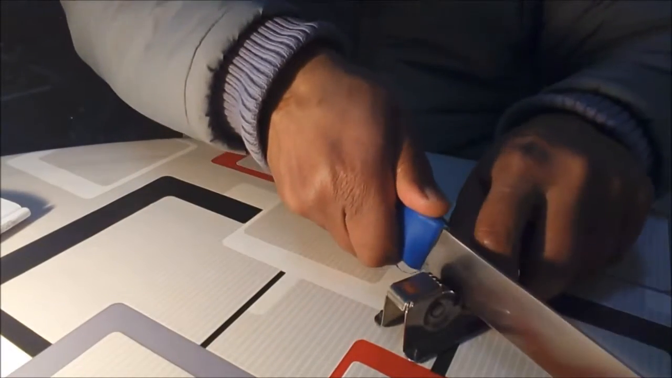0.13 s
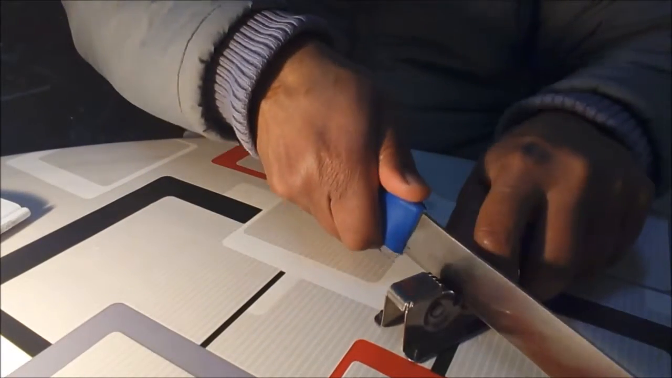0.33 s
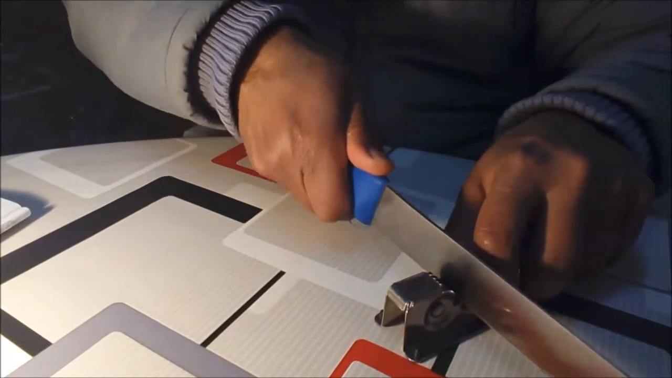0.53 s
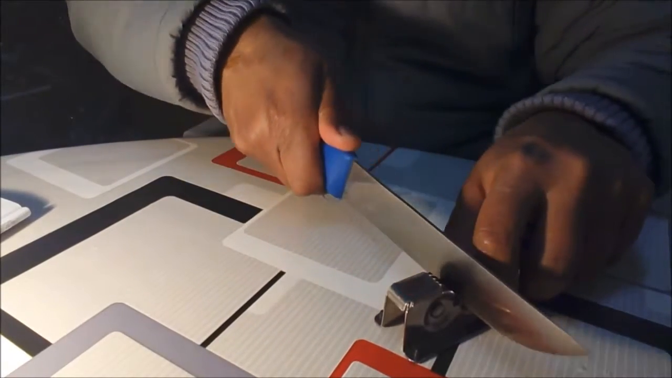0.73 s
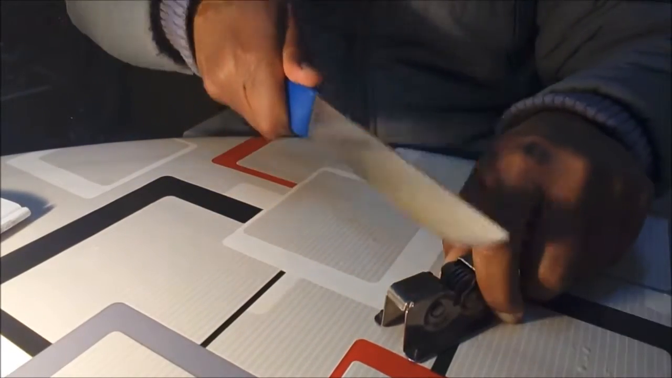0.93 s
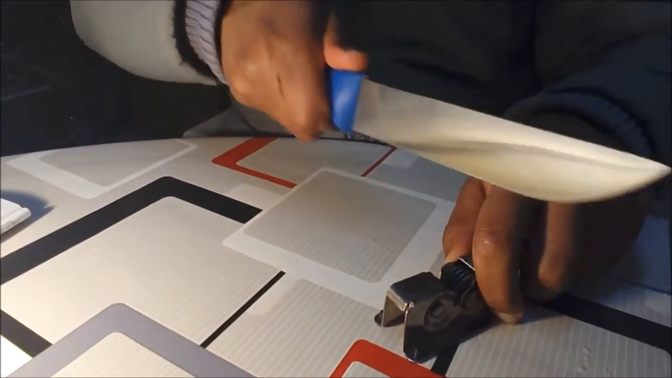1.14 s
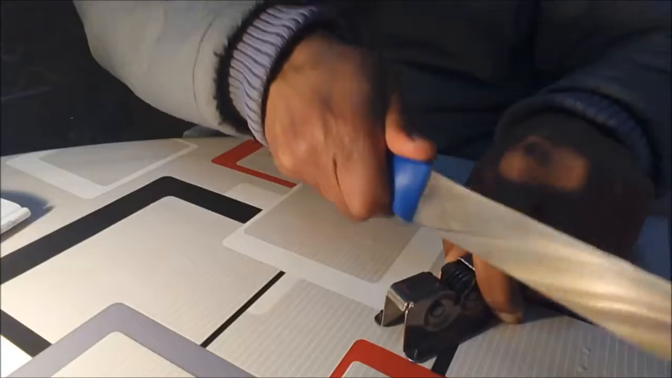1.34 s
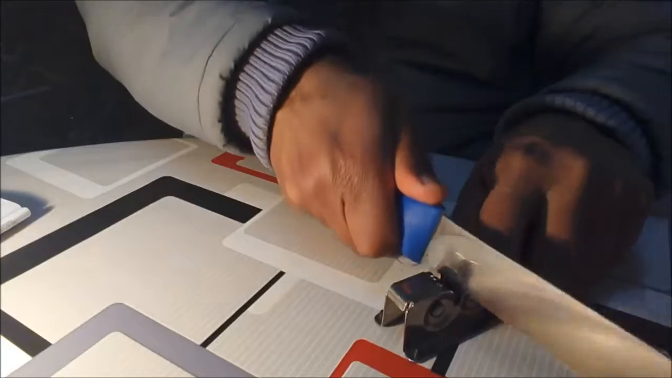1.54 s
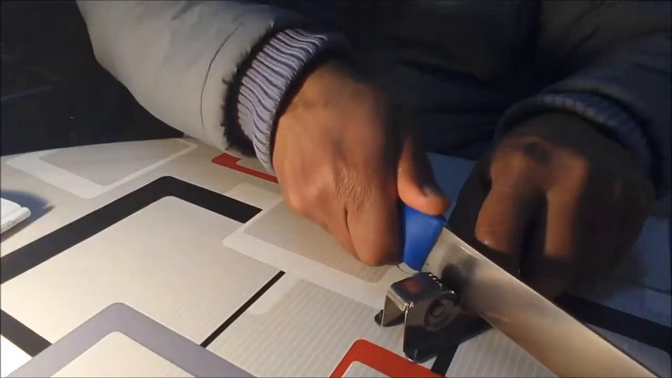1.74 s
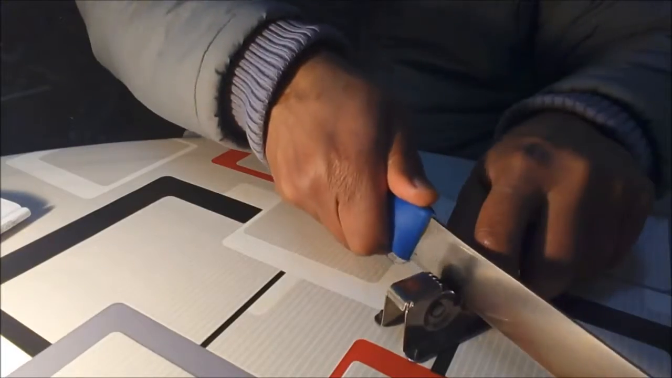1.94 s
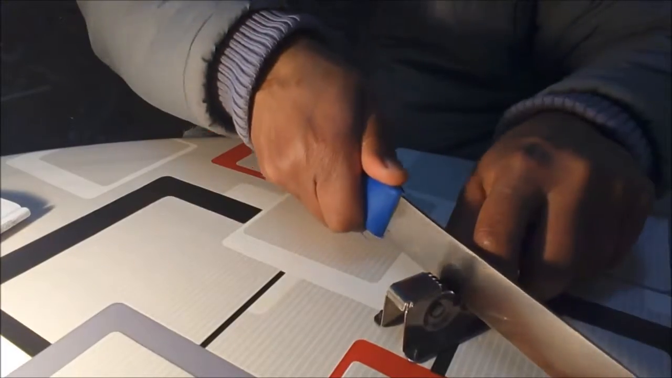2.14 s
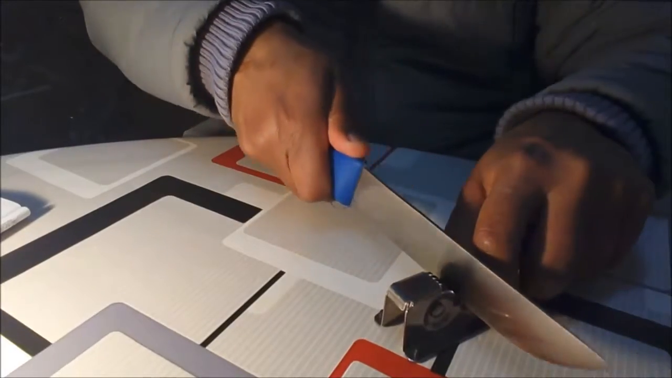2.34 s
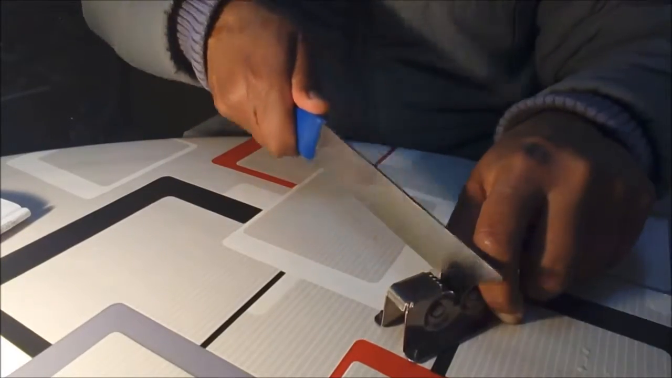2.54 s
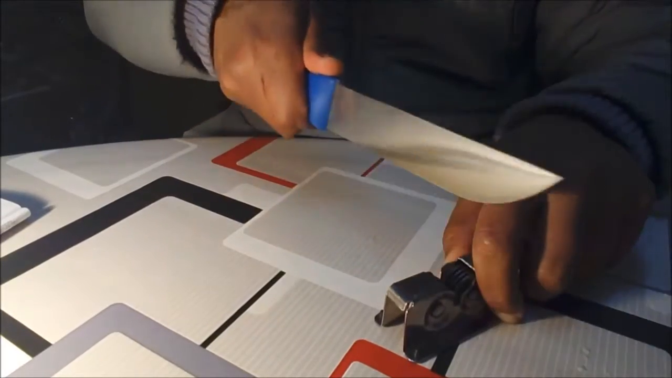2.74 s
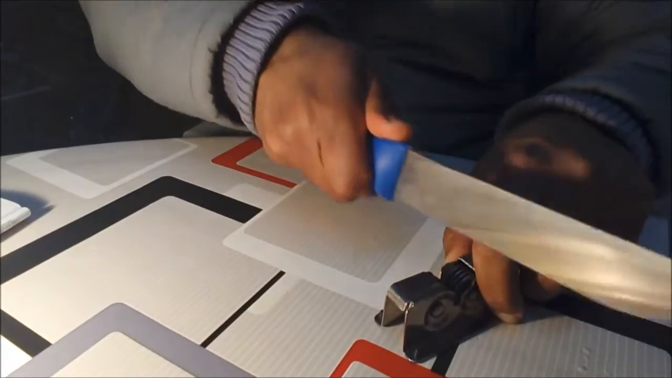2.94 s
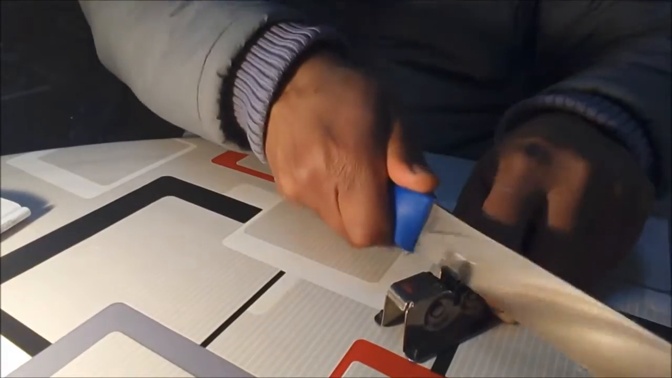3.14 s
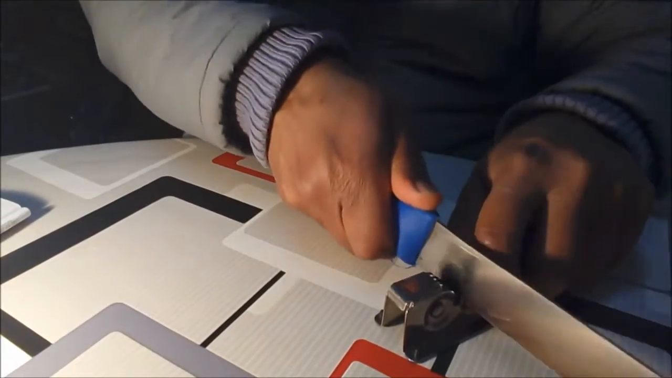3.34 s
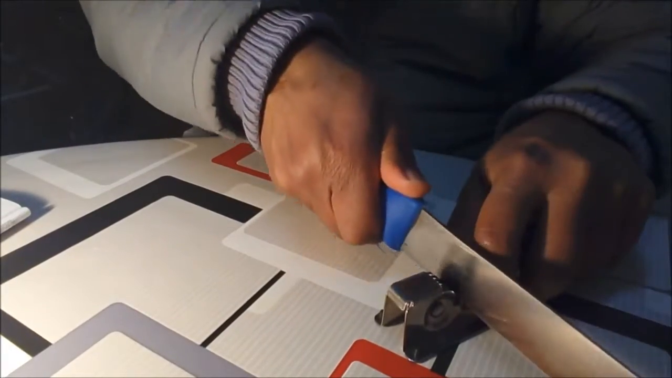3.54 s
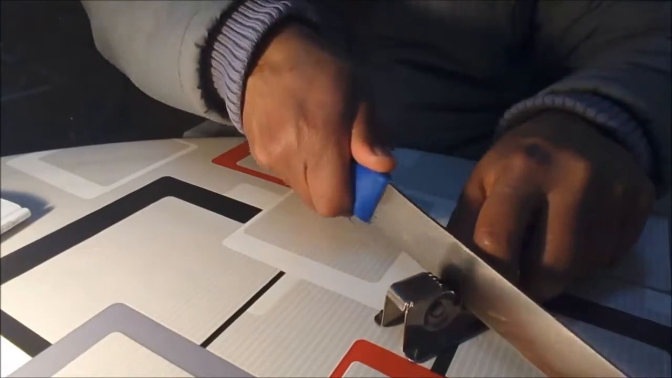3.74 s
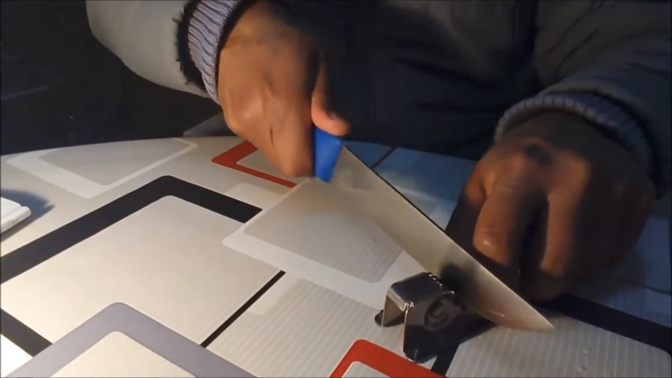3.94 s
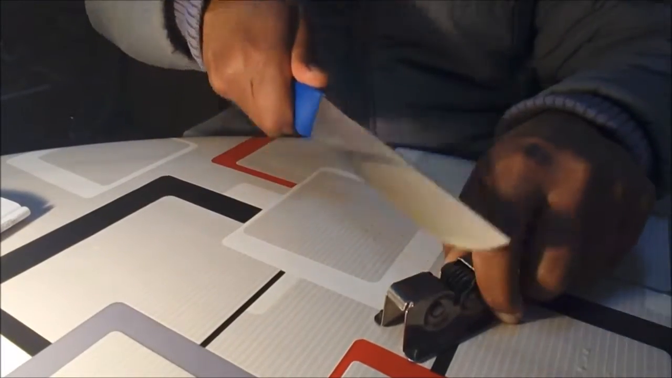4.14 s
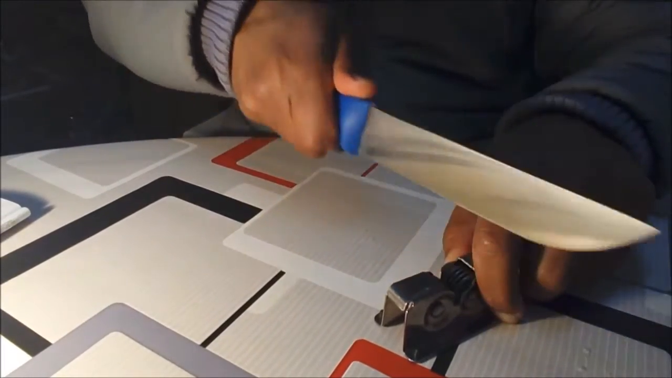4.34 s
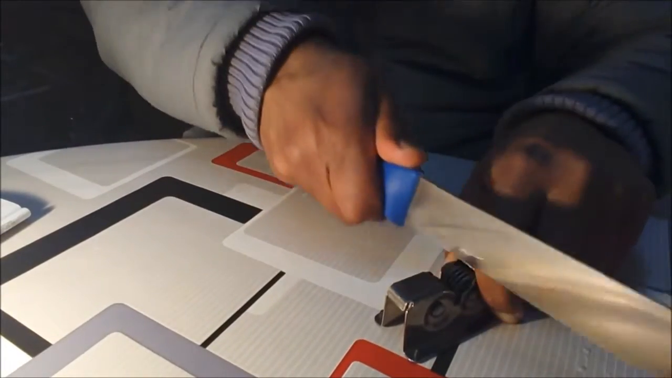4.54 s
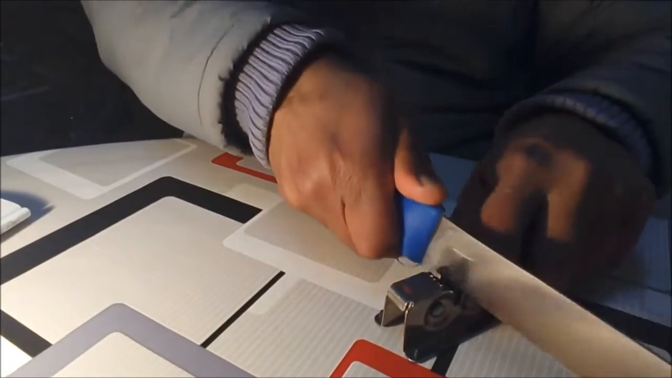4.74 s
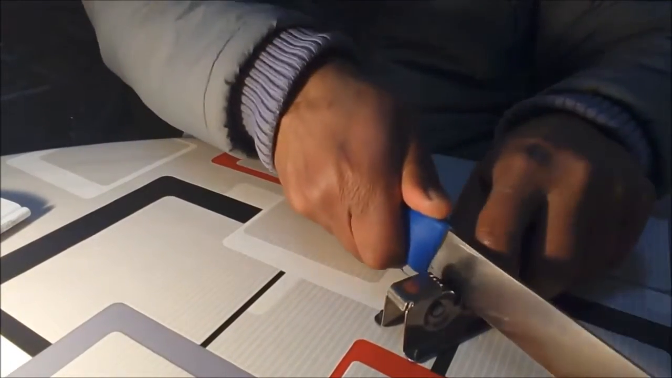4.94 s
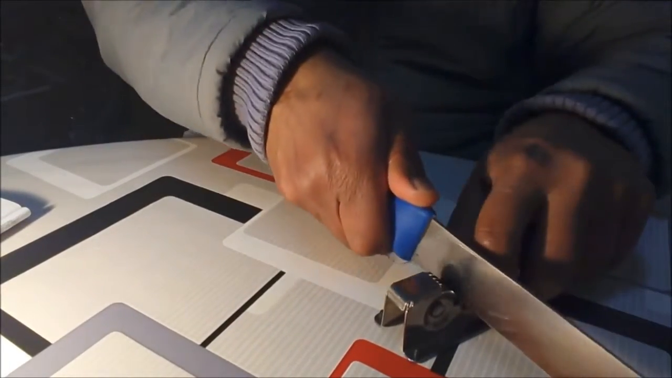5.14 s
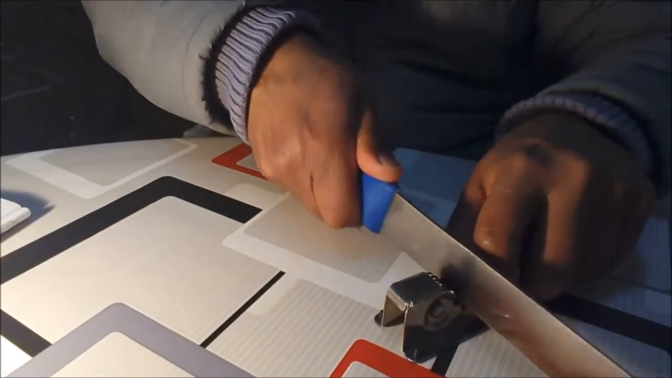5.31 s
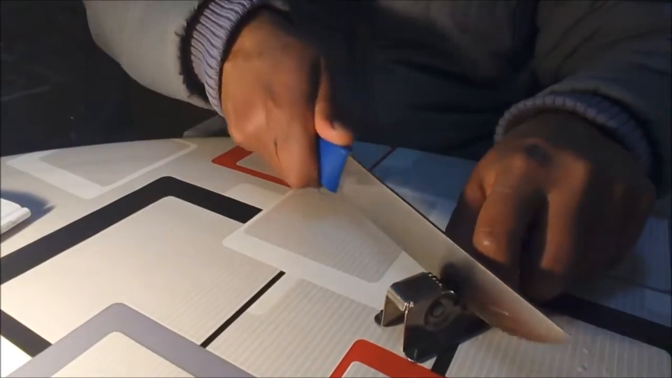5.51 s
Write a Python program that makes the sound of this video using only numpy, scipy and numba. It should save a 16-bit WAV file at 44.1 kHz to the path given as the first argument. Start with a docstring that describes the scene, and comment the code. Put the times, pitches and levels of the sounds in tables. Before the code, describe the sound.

Close up in a small quiet room, a knife blade is pulled through a little steel sharpener on a table. Each pull begins with a thud and sharp tick, grinds harshly over low table rumble, then the tip scratches free and the blade rings briefly. Three full strokes and a fourth cut off, with soft sleeve rubbing between.

```python
"""Knife on a disc sharpener

A kitchen knife is pulled through a small steel disc sharpener on a table, close up; the fourth pull is cut short.
Knocks ring the table's modes, and ticks are noise cracks with a short ring of the seated blade.
Each pull grinds from heel to tip: uneven noise through steel, grit and sizzle colours, over table rumble.
After the first three pulls the tip scratches off and the free blade rings in beating pairs.
Hands and sleeves rub softly between pulls, in a small, quiet room with faint air and hiss."""
import sys
import numpy as np
from scipy import signal
from scipy.fft import rfft, irfft
from scipy.io import wavfile
from scipy.ndimage import uniform_filter1d
from numba import njit

SR = 44100
rng = np.random.default_rng(int(sys.argv[2]) if len(sys.argv) > 2 else 0)


def generate_wav(signal):
    """Clip the signal to [-1, 1] and save it as 16-bit WAV at the path in sys.argv[1]."""
    frames = np.transpose(np.atleast_2d(signal))
    scaled = np.clip(frames, -1, 1) * 32767
    pcm = np.round(scaled).astype(np.int16)
    wavfile.write(sys.argv[1], SR, pcm)


N = 250047
TIME = np.arange(N) / SR


def undb(db):
    """Decibels to gain."""
    return 10 ** (np.asarray(db) / 20)


def unit(x):
    """Scale to rms 1."""
    return x / np.sqrt(np.mean(x ** 2))


def peak(x, db):
    """Scale to a peak level."""
    return x * undb(db) / np.abs(x).max()


def ring(x, impulse_response):
    """Drive an impulse response with x."""
    return signal.fftconvolve(x, impulse_response)[:len(x)]


def response(points, size=4096):
    """Causal, minimum-phase impulse response with a (f/Hz, level/dB) spectrum."""
    points_hz, points_db = np.transpose(points)
    hz = np.fft.rfftfreq(size, 1 / SR)
    gain = undb(np.interp(np.log(hz + 1), np.log(points_hz), points_db))
    cepstrum = irfft(np.log(gain))
    # folding the cepstrum forward in time makes the response causal
    cepstrum[1:size // 2] *= 2
    cepstrum[size // 2 + 1:] = 0
    return irfft(np.exp(rfft(cepstrum)))


def modes(table, size=32768):
    """Damped sines; neighbouring modes start in opposite directions."""
    t = TIME[:size]
    total = np.zeros(size)
    for k, (hz, db, t60) in enumerate(table):
        decay = undb(db - 60 * t / t60)
        total += (-1) ** k * decay * np.sin(2 * np.pi * hz * t)
    return total


def walk(rate):
    """Chance curve of rms 1: straight lines between random points, rate points a second."""
    knots = rng.standard_normal(N // 10)
    return unit(np.interp(TIME * rate, np.arange(len(knots)), knots))


def burst(decay_s, size=8192):
    """A cluster of tiny fractures: noise that dies away."""
    return rng.standard_normal(size) * np.exp(-TIME[:size] / decay_s)


def diffuse(decay_s, size=16384, count=70):
    """Response of crowded modes: rippled from one mode to the next, flat over wider bands."""
    spectrum = rfft(burst(decay_s, size=size))
    band_level = np.sqrt(uniform_filter1d(np.abs(spectrum) ** 2, count))
    return irfft(spectrum / band_level)[:size // 2]


def add(track, s, sound):
    """Mix a sound in at time s."""
    start = int(s * SR)
    track[start:start + len(sound)] += sound[:N - start]


@njit
def resonate(x, hz, width):
    """Band-pass whose centre moves every sample."""
    y, band, low = np.empty(len(x)), 0., 0.
    for i in range(len(x)):
        g, k = np.tan(np.pi * hz[i] / SR), width / hz[i]
        v = (band + g * (x[i] - low)) / (1 + g * (g + k))
        band = 2 * v - band
        low += 2 * g * v
        y[i] = k * v
    return y


def held(start, length, rise_s, fade_s):
    """Gain of a contact: swells up to 1 at its start, holds, then fades, both exponentially."""
    before = np.maximum(start - TIME, 0)
    after = np.maximum(TIME - start - length, 0)
    return np.exp(-before / rise_s - after / fade_s)


# colour of the room background: f/Hz, relative level/dB per Hz
QUIET_COLOUR = [(25, -3.5), (130, 0.5), (230, 0), (330, -5), (450, -6.5), (1000, -13), (2500, -17.5),
                (6000, -20), (7000, -26.5), (7800, -31.5), (15000, -36.5)]
QUIET_DB = -69.5  # rms


def background():
    """Faint, steady room air and hiss: noise through a fixed colour."""
    return undb(QUIET_DB) * unit(ring(rng.standard_normal(N), response(QUIET_COLOUR)))


# hands and sleeves shift on the table between pulls: start t/s, length t/s, level/dB
SHUFFLE_MOVES = [(0.0, 0.17, -56), (1.6, 0.36, -72), (2.916, 0.26, -63), (3.34, 0.29, -67.5),
                 (4.505, 0.64, -72)]
# colour of that rubbing: f/Hz, relative level/dB
SHUFFLE_COLOUR = [(30, -14), (75, 1.5), (145, 7), (215, -4), (320, -3), (430, -15), (900, -47),
                  (3000, -49.5)]


def hands(rough_db=3, rise_s=0.038, fade_s=0.05):
    """Soft, uneven rubbing of hands and sleeves, dulled by the table."""
    rub = rng.standard_normal(N) * undb(rough_db * walk(35))
    moves = sum(undb(db) * held(s, length, rise_s, fade_s) for s, length, db in SHUFFLE_MOVES)
    return moves * unit(ring(rub, response(SHUFFLE_COLOUR)))


# table top modes, before the table's overall colour: f/Hz, level/dB, decay by 60 dB t/s
TABLE_MODES = [(65, -13, 0.16), (105.8, -12.5, 0.48), (129.3, -3, 0.15), (152.8, -2, 0.28),
               (183.5, -1, 0.2), (220.3, -6.5, 0.26), (250.7, 2.5, 0.22), (277, 1, 0.21), (310, -3, 0.47),
               (346.6, -4, 0.3), (380, -1.5, 0.2), (404.8, -5, 0.26), (443.3, -3, 0.232),
               (461, -0.5, 0.031)]


def table_top():
    """Impulse response of the table: its modes, strongest in the low mids."""
    colour = response([(30, -22.0), (70, -7), (140, 1), (480, -7), (750, -14.0), (2000, -31.5)])
    return ring(modes(TABLE_MODES), colour)


# the blade lands or catches and jolts the table:
# t/s, thud peak level/dB, contact softness (low-pass corner) f/Hz, crunch peak level/dB
KNOCK_EVENTS = [(0.041, -34.5, 106, -65), (0.604, -27.5, 700, -28), (1.046, -29, 700, -34),
                (1.825, -32.5, 384, -55.5), (1.857, -38.5, 265, -63), (1.908, -20.5, 132, -49.5),
                (2.678, -45, 700, -36), (2.692, -29.5, 700, -32.5), (3.537, -45.5, 600, -57),
                (3.555, -34, 495, -56), (3.568, -14, 222, -31.5), (3.942, -28.5, 700, -37),
                (4.228, -28, 686, -39), (5.133, -31, 600, -59), (5.140, -13.5, 280, -33)]
# bending wave that a knock sends through the table: f/Hz, relative level/dB
THUD_COLOUR = [(25, -26.5), (45, -22), (65, -8.5), (100, 6), (160, 3), (260, 7.5), (400, -0.5), (600, -8),
               (1200, -19), (4000, -46)]
# coarse grit, in the knocks' crunch and in the scrape: f/Hz, relative level/dB
GRIT_COLOUR = [(300, -1.5), (550, 4), (800, -3), (1150, 0.5), (1600, -1), (2100, -3.5), (3000, -2.5),
               (6000, -11.5), (9000, -32)]


def knocks(table, spread_s=0.0041, ring_db=-10, crunch_s=0.015, size=32768):
    """A bending wave crosses the table, highs first, and leaves its modes ringing; grit crunches."""
    out, hz = np.zeros(N), np.fft.rfftfreq(size, 1 / SR)
    # bending waves travel as the root of frequency; spread_s is the delay at 200 Hz
    dispersion = np.exp(-4j * np.pi * spread_s * np.sqrt(200 * hz))
    wave = -irfft(rfft(response(THUD_COLOUR), size) * dispersion)
    body = peak(wave, 0) + peak(ring(table, wave), ring_db)
    for s, thud_db, soft_hz, crunch_db in KNOCK_EVENTS:
        thud = signal.lfilter(*signal.butter(2, soft_hz, fs=SR), body)
        add(out, s, peak(thud, thud_db))
        crunch = ring(burst(crunch_s), response(GRIT_COLOUR))
        add(out, s + 0.002018, peak(crunch, crunch_db))
    return out


# pulls from heel to tip: start t/s, length t/s, time to full speed t/s, softness at the heel level/dB,
# then base gains of scrape, sizzle, grit and table rumble level/dB
PULL_EVENTS = [(0.277, 0.82, 0.41, -17.5, -42, -56, -48, -41.5),
               (2.019, 0.72, 0.29, -14, -39, -56, -47.5, -39.5),
               (3.604, 0.66, 0.25, -13.5, -40.5, -60, -47, -41),
               (5.178, 0.62, 0.38, -14.5, -38.5, -54, -46, -38.5)]
# how each layer follows a pull: share of the heel softness,
# gain where the hand bears down level/dB, change at the tip level/dB
SCRAPE_FOLLOW = (1, 0.61, -13)
SIZZLE_FOLLOW = (1.95, 1.1, -10.5)  # same columns
GRIT_FOLLOW = (1, 0.83, -3)  # same columns
RUMBLE_FOLLOW = (0.46, 5.54, -2.2)  # same columns
# uneven spots where the edge bites harder or skims:
# middle t/s, reach either side t/s, gains of scrape, sizzle and chatter (grit and rumble) level/dB
UNEVEN_SPOTS = [(0.44, 0.071, 3, -1, 3.5), (0.624, 0.0051, 6.5, 14, 5), (0.672, 0.033, -1.5, -12, 1),
                (0.756, 0.048, 1.2, 1, 3.5), (2.277, 0.019, 3.5, 3, 2.5), (2.523, 0.045, 1.5, 0.3, 2.5),
                (4.13, 0.05, 0, 2, -1.5), (5.437, 0.036, 2, 0, 5)]
# the hand bears down hardest past the middle (shares of the edge)
PRESS_PLACE, PRESS_REACH = 0.65, 0.13
# the curved tip rides up out of the slot over the last share of the edge
TIP_SHARE = 0.16
# contact is made and lost (s)
BITE_S, LET_GO_S = 0.018, 0.031


def pulls(ease=1.89):
    """Place on the edge (0 heel, 1 tip) and layer gains: pulls speed up, bear down, lift at the tip."""
    place, gains = np.zeros(N), np.zeros((4, N))
    laws = np.array([SCRAPE_FOLLOW, SIZZLE_FOLLOW, GRIT_FOLLOW, RUMBLE_FOLLOW])
    for start, length, speed_up_s, heel_db, *full_db in PULL_EVENTS:
        along = np.clip((TIME - start) / length, 0, 1)
        speed = np.clip((TIME - start) / speed_up_s, 0, 1)
        slow_db = heel_db * (1 - speed) ** ease
        press = np.exp(-((along - PRESS_PLACE) / PRESS_REACH) ** 2)
        lift = np.maximum(1 - (1 - along) / TIP_SHARE, 0) ** 2
        layer_db = np.array(full_db)[:, None] + laws @ [slow_db, press, lift]
        gains += held(start, length, BITE_S, LET_GO_S) * undb(layer_db)
        # the place returns to the heel 0.1 s ahead of each pull
        place = np.where(TIME > start - .1, along, place)
    for s, reach, scrape_db, sizzle_db, chatter_db in UNEVEN_SPOTS:
        bump = np.exp(-((TIME - s) / reach) ** 2)
        gains *= undb(np.outer([scrape_db, sizzle_db, chatter_db, chatter_db], bump))
    return place, gains


# blade resonances slide as the contact travels along the edge:
# at the heel f/Hz, at the tip f/Hz, width f/Hz, relative level/dB
PINNED_MODES = [(3000, 2650, 330, 1.5), (3950, 3900, 110, -14), (5160, 6500, 220, -3),
                (6320, 7700, 300, -8), (9700, 10000, 290, -10.5), (9660, 9950, 150, -6.5)]


def pinned_blade(place, spurts, wander, flicker_db):
    """Moving resonances of the blade in the slot, excited by noisy spurts, at rms 1 before trimming."""
    pinned = 0
    # the blade rocks in the slot, so its main resonances wander and take turns
    for heel, tip, width, db in PINNED_MODES:
        hz = heel + (tip - heel) * place + wander * np.sqrt(3000 * heel) * walk(25)
        level = undb(db + flicker_db * walk(18))
        pinned = pinned + level * resonate(rng.standard_normal(N) * spurts, hz, float(width))
    # the blade hardly radiates just above 8 kHz, nor in the bass
    pinned = unit(signal.lfilter(*signal.iirnotch(8100, 8, fs=SR), pinned))
    pinned = signal.lfilter(*signal.butter(2, 1900, "high", fs=SR), pinned)
    # leave the top to the sizzle of a fast edge
    return signal.sosfilt(signal.butter(10, 10200, fs=SR, output="sos"), pinned)


# colour of steel on steel: f/Hz, relative level/dB
STEEL_COLOUR = [(1200, -35), (2250, -11.5), (2600, 5), (3300, 1), (3900, -3), (4700, -6.5), (5900, -0.5),
                (7050, -2.5), (7650, -7.5), (8100, -23), (8600, -15), (9150, -13.5), (9900, -7),
                (10800, -33), (15000, -46)]
# colour of the fine sizzle: f/Hz, relative level/dB
SIZZLE_COLOUR = [(7000, -59), (9000, 9.5), (10300, 13.5), (11000, 0.5), (12000, 7.5), (12800, -10),
                 (13500, -3), (14300, -1), (15200, -1.5)]


def scrape(table, judder_db=1.3, grit_judder_db=3.5, grain_db=1.0, steel_db=-2, pinned_db=-7, heel_db=6,
           grit_db=-1, rumble_db=-2.5, tilt_db=5, sizzle_db=1, wander=0.0093, flicker_db=5.5):
    """Burrs on the edge snap past the discs in uneven spurts, shaking blade, sharpener and table."""
    place, (force, sizzle, grit, rumble) = pulls()
    slip = unit(walk(420) + 0.33 * walk(70))
    spurts = undb(grain_db * walk(4000) + judder_db * slip)
    fine = unit(rng.standard_normal(N) * spurts)
    coarse = unit(rng.standard_normal(N) * undb(grit_judder_db * slip))
    # each snap is heard directly and through the crowded high modes of the steel
    steel = unit(ring(fine + 0.3 * ring(fine, diffuse(0.0058)), response(STEEL_COLOUR)))
    pinned = pinned_blade(place, spurts, wander, flicker_db)
    # the slow start at the heel mostly wakes the main resonances; further on the scrape is broad
    slow_db = heel_db * np.exp(-(place / 0.3) ** 2)
    blade = force * (undb(steel_db - slow_db) * steel + undb(pinned_db + slow_db) * pinned)
    rough = coarse + 0.56 * ring(coarse, diffuse(0.0051))
    crunch = undb(grit_db) * grit * unit(ring(rough, response(GRIT_COLOUR)))
    snaps = rng.standard_normal(N) * spurts
    bright = snaps + 0.86 * ring(snaps, diffuse(0.0068))
    hiss = undb(sizzle_db) * sizzle * unit(ring(bright, response(SIZZLE_COLOUR)))
    # the table is driven through the sharpener's feet and rings on after the pull
    # its rumble is deep at the slow heel and moves up along the edge
    deep = signal.sosfiltfilt(signal.butter(2, 230, fs=SR, output="sos"), coarse)
    tilt = undb(tilt_db * (np.minimum(place, 0.6) - 0.22))
    drive = rumble * (deep / tilt + (coarse - deep) * tilt)
    boom = undb(rumble_db) * ring(drive, table / np.linalg.norm(table))
    return blade + crunch + hiss + boom


# the edge sings on one resonance: middle t/s, half-length t/s, pitch at the middle f/Hz,
# rms level before the swell and fade level/dB
SQUEAL_EVENTS = [(.31, 0.052, 3300, -60), (0.313, 0.062, 2010, -62.5), (0.319, .06, 9300, -84),
                 (0.848, 0.07, 2570, -52), (2.04, .04, 3110, -53), (2.112, 0.067, 9820, -57),
                 (2.31, 0.084, 5900, -46), (3.726, 0.048, 6500, -51), (3.877, 0.077, 5970, -45.5),
                 (4.136, 0.057, 2790, -45), (5.265, .04, 6500, -56), (5.341, 0.067, 6780, -50),
                 (5.401, 0.068, 6730, -45), (5.461, .07, 9140, -48)]


def squeals(width_hz=170, glide=0.13):
    """Brief, rough, slightly rising tones where the friction locks to a blade resonance."""
    out = np.zeros(N)
    for s, half, hz, db in SQUEAL_EVENTS:
        t = TIME[:int(2 * half * SR)]
        pitch = hz * (1 + glide * (t - half))
        tone = rng.standard_normal(len(t))
        for _ in range(2):  # two passes narrow the noise to a rough tone
            tone = resonate(tone, pitch, float(width_hz))
        add(out, s - half, undb(db) * unit(tone) * np.hanning(len(t)))
    return out


# sharp ticks of the edge: t/s, crack peak level/dB, brightness f/Hz, blade ring peak level/dB
TICK_EVENTS = [(0.43, -31, 5370, -50), (1.83, -57, 4500, -55), (1.906, -47, 4500, -44),
               (1.957, -40, 8000, -51), (3.54, -52, 5000, -53), (3.558, -54, 5000, -62),
               (3.569, -33.5, 5300, -43.5), (3.573, -29, 5030, -59), (5.136, -49, 5000, -61),
               (5.140, -36.5, 5360, -57), (5.146, -31, 4000, -64), (5.17, -41, 8000, -58),
               (5.18, -29.5, 5540, -49)]
# colour of a tick, shared by the release scratch: f/Hz, relative level/dB
TICK_COLOUR = [(500, -31), (2000, 22), (5000, 18.5), (6800, 23), (8200, 11.5), (9500, 16), (10600, -12),
               (11800, 6), (15000, -10)]
# modes of the blade seated in the slot: f/Hz, relative level/dB, decay by 60 dB t/s
SEATED_MODES = [(1830, -10, 0.18), (2873, -6.5, 0.13), (3860, -8, 0.1), (5280, 1.5, 0.2), (5420, -4, .1),
                (6480, 2, 0.06), (7270, -4, 0.05), (8500, -20, 0.11), (9700, -26, .05)]


def ticks(crack_s=0.0019):
    """The edge taps the discs: a hard crack and a short ring of the seated blade."""
    out = np.zeros(N)
    for s, crack_db, bright_hz, ring_db in TICK_EVENTS:
        crack = ring(burst(crack_s), response(TICK_COLOUR))
        crack = resonate(crack, np.full(len(crack), float(bright_hz)), 8400.0)
        add(out, s, peak(crack, crack_db))
        add(out, s, peak(modes(SEATED_MODES), ring_db))
    return out


# the tip slips off: t/s, scratch peak level/dB, ring peak level/dB, nominal main ring f/Hz
RELEASE_EVENTS = [(1.091, -43, -43, 6010), (2.742, -36, -39.5, 6250), (4.272, -38, -38.5, 6120)]
# other modes of the free blade: nominal f/Hz, relative level/dB, decay by 60 dB t/s
FREE_MODES = [(1100, -20.5, 0.41), (2105, -9, 0.53), (2970, -19, 0.22), (3900, -14, 0.38), (4520, -20, .26),
              (4640, -7, 0.3), (5240, -2, .32), (5720, -7, 0.28), (5730, -6, 0.25), (6220, -16, 0.16),
              (6900, -11, 0.13), (8800, -11, 0.24), (9500, -16, .2)]


def releases(scratch_s=0.0084, grip=0.00403, main_db=0, main_t60=0.26):
    """The tip scratches off and the blade rings in close, beating pairs, tuned a little by each grip."""
    out = np.zeros(N)
    for s, scratch_db, ring_db, main_hz in RELEASE_EVENTS:
        scratch = burst(scratch_s)
        # the scratch swells as the point climbs over the rim
        swell = scratch * TIME[:len(scratch)]
        add(out, s, peak(ring(swell, response(TICK_COLOUR)), scratch_db))
        blade = list(FREE_MODES) + [(main_hz, main_db, main_t60)]
        # every mode twice, each copy detuned by chance
        tuned = [(hz * (1 + grip * rng.standard_normal()), db, t60) for hz, db, t60 in blade * 2]
        free_ring = ring(modes(tuned), diffuse(0.0013, count=40))
        add(out, s, peak(free_ring, ring_db))
    return out


def room(x, t60=0.57, wet_db=-9):
    """Diffuse tail of a small room, dull above 7 kHz."""
    colour = response([(80, 1.0), (300, 5.5), (1000, -1), (4300, -2.0), (6500, 2), (8000, -20), (13000, -5)])
    tail = diffuse(t60 / np.log(1000), size=65536, count=140)
    return undb(wet_db) * ring(x, ring(tail, colour))


def scene(side_room_db=-13, side_air_db=-3, side_hz=900):
    """All sources sit in the centre; only the air and the low room sound differ between the ears."""
    table = table_top()
    dry = hands() + knocks(table) + scrape(table) + squeals() + ticks() + releases()
    mid = dry + room(dry) + background()
    low_band = signal.butter(2, [side_hz / 2, side_hz], "bandpass", fs=SR)
    spread = signal.lfilter(*low_band, room(dry))
    side = undb(side_room_db) * spread + undb(side_air_db) * background()
    return np.array([mid + side, mid - side])


TOP_HZ = 15400


def record(dry):
    """The microphone cuts the top steeply: an elliptic low-pass."""
    return signal.sosfilt(signal.ellip(10, .2, 70, TOP_HZ, fs=SR, output="sos"), dry)


dry = scene()
out = record(dry)
generate_wav(out)
```